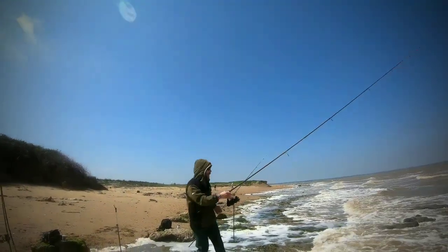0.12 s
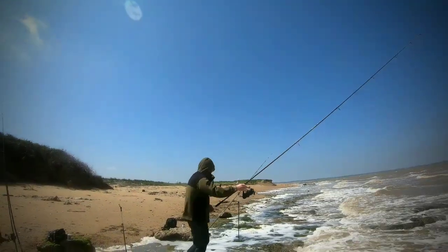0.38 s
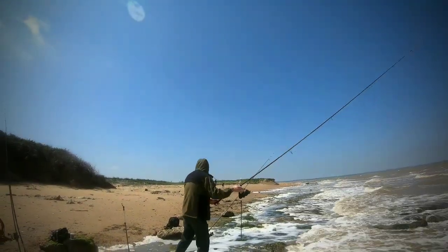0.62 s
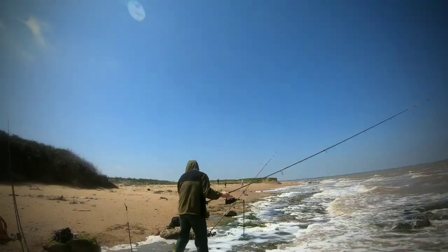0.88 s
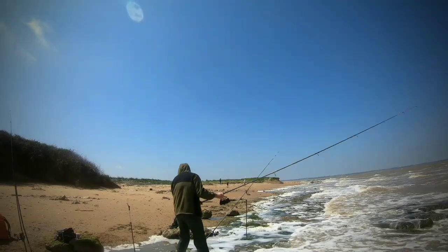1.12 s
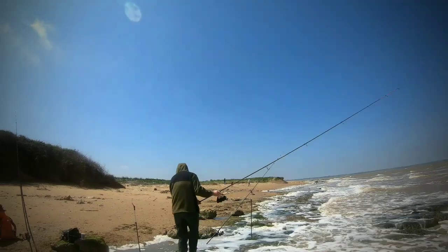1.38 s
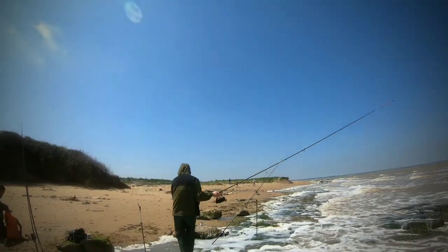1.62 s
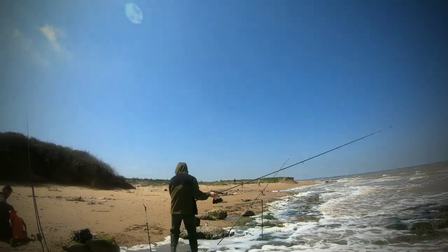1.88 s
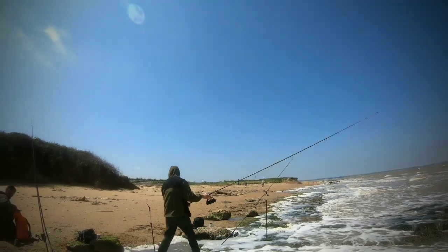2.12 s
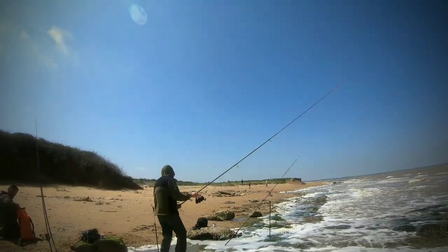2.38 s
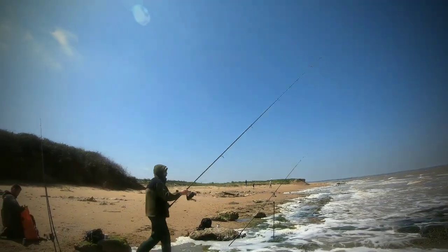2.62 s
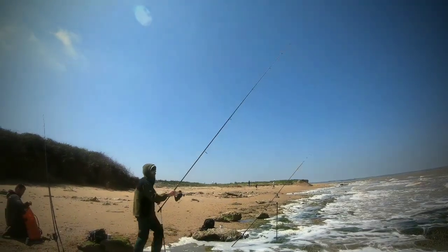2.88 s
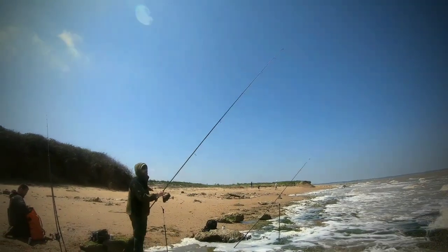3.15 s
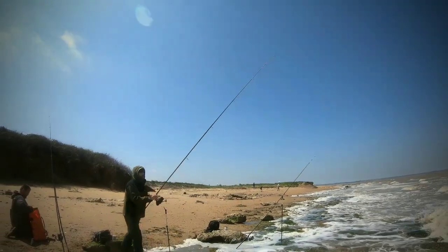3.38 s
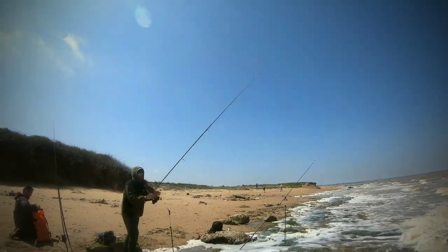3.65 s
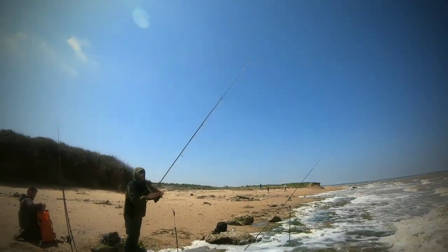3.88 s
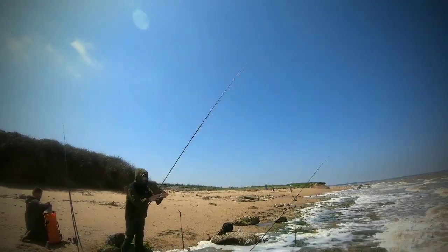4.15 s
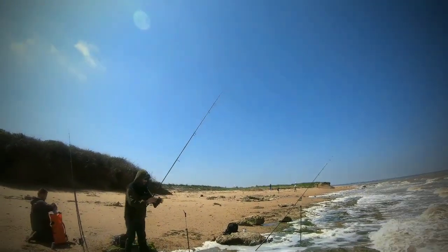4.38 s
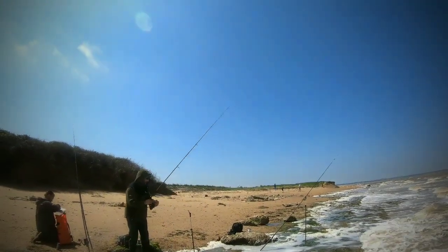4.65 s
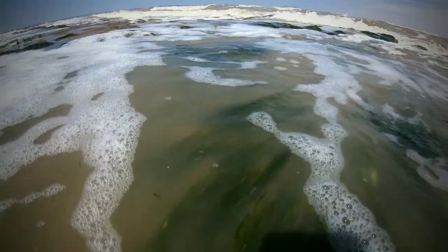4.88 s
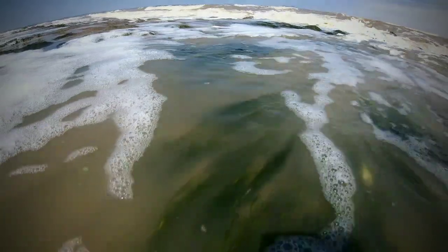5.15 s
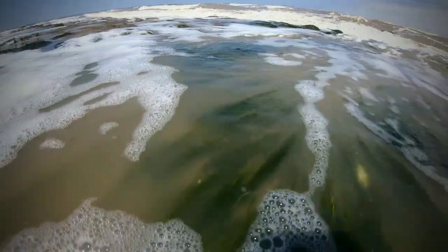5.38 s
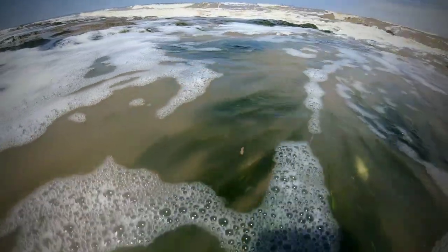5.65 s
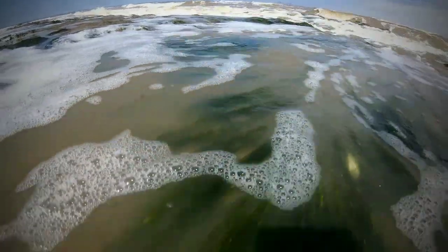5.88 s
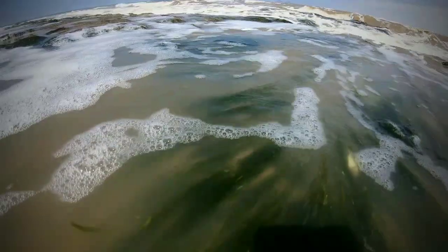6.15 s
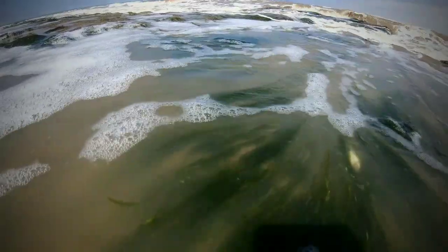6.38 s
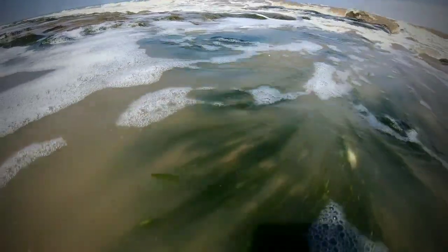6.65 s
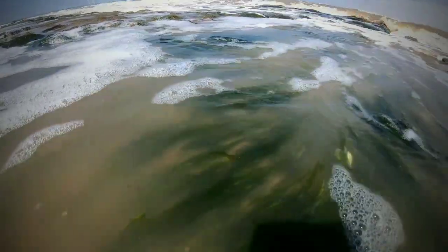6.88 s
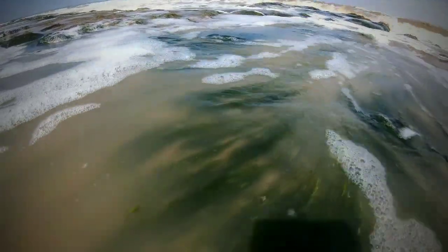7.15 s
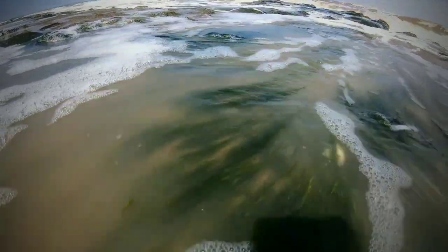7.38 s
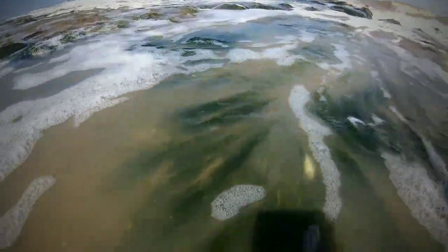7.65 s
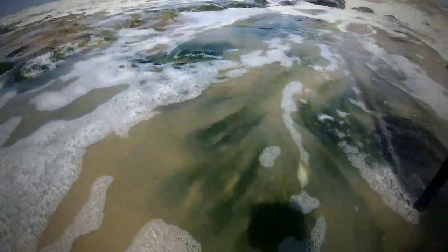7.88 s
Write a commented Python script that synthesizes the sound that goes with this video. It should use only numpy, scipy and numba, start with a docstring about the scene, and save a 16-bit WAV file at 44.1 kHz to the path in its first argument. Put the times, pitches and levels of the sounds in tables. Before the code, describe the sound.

Surf washes and roars over beach rocks while wind rumbles and slaps the microphone, then a brief silence and quieter foaming water under more low wind.

```python
"""Surf breaks over rocks on a windy beach: thousands of ringing bubbles mixed with noise make the roar
and fizz, and single waves ring as swelling bands of noise. Wind shakes a microphone port in a low rumble
of filtered noise, with short noise buffets and rising whistles. A few drops tick close by, and drifting
spray brightens the top. After a cut to silence, a second scene fades in low over the washing foam."""
import sys
import numpy as np
from scipy import signal
from scipy.fft import rfft, irfft, next_fast_len
from scipy.io import wavfile
from scipy.ndimage import uniform_filter1d
from numba import njit

SR = 44100
rng = np.random.default_rng(int(sys.argv[2]) if len(sys.argv) > 2 else 0)


def invert_db(x):
    """Field ratio 10**(x/20) for x, a level in decibels (scalar or array-like)."""
    u = np.asarray(x, float) / 20
    return 10 ** u


def int16_out(signal):
    """Quantize to a 16-bit WAV file."""
    q = np.round(np.clip(np.atleast_2d(signal).T, -1, 1) * 32767)
    wavfile.write(sys.argv[1], SR, q.astype(np.int16))


N = 353682  # samples, about 8 s
T = np.arange(N) / SR  # s
HZ = np.fft.rfftfreq(next_fast_len(N), 1 / SR)
CUT_S, FADE_FROM_S, FADE_TO_S = 4.922, 5.108, 5.21  # first scene stops; second fades in


def unit(x):
    """Scale to rms 1."""
    return x / np.sqrt(np.mean(x ** 2))


def shaped(x, gain):
    """Filter by a gain for each frequency."""
    size = next_fast_len(N)
    return irfft(rfft(x, size) * gain, size)[:N]


def colour(points):
    """Gain curve through (f/Hz, level/dB) points on a log frequency axis."""
    hz, db = np.transpose(points)
    return invert_db(np.interp(np.log(HZ + 1), np.log(hz), db))


def curves(tables):
    """Join the scenes' tables and draw each column as a curve over time."""
    s, *columns = np.transpose(np.concatenate(tables))
    return [np.interp(T, s, column) for column in columns]


def random_level(rate):
    """Random steps, rate a second, smoothed into a wandering curve of rms 1."""
    hold = int(SR / rate)
    steps = np.repeat(rng.standard_normal(N // hold + 1), hold)
    return unit(uniform_filter1d(uniform_filter1d(steps, hold), hold)[:N])


def swells(rows):
    """Add up bell-shaped rises or falls in dB, one a row."""
    return sum(db * np.exp(-(2 * (T - s) / max(length, .01)) ** 2) for s, db, length in rows)


def evened(x, span_s, share=0.87):
    """Take out a share of the noise's own swell over span_s, so that the level curves stand out."""
    k = max(int(span_s * SR), 64)
    power = uniform_filter1d(uniform_filter1d(x ** 2, k), k)
    return x / power ** (share / 2)


@njit
def bubbles(start, hz, cycles, size, n, glide):
    """Each bubble rings and dies within a few cycles, rising in pitch as it nears the surface."""
    out = np.zeros(n)
    for k in range(len(start)):
        length = int(cycles[k] * SR / hz[k])
        turn = np.exp(2j * np.pi * hz[k] / SR - 2 / length)
        rise = np.exp(2j * np.pi * hz[k] / SR * glide / length)
        z = size[k] + 0j
        for i in range(start[k], min(start[k] + 3 * length, n)):
            out[i] += z.imag
            z *= turn
            turn *= rise
    return out


# the foam hiss changes less than the wash: it takes only a share of each change around the usual wash
HISS_DB, HISS_FOLLOWS, USUAL_WASH_DB = -7, 0.48, -41
# washing and breaking water, one table a scene:
# (t/s, wash level/dB in the middle band, low roar level/dB against the scene's colour)
SURF_LEVELS = [
    [(0.0, -39.5, 0), (0.4, -39.5, -2.5), (0.65, -37.5, -2), (0.85, -35.5, 0), (1.03, -37.5, 1.5),
     (1.17, -37.5, 2.5), (1.3, -38.5, 3), (1.5, -36, 1), (1.8, -37, 0), (2.1, -37, 2), (2.5, -35, -1),
     (2.75, -34, -2.5), (2.82, -33, -5), (2.9, -33, -5), (2.98, -35, -5), (3.03, -39.5, -1.5),
     (3.15, -38, -3.5), (3.45, -38.5, -5.5), (4.0, -42, -1.5), (4.25, -46.5, -3), (4.6, -43, -3.5),
     (4.9, -42, -5.5)],
    [(5.25, -47, 0), (5.55, -43.5, 0.5), (6.15, -43.5, -0.5), (6.55, -41.5, 1), (7.07, -43.5, 0.5),
     (7.29, -42, 1), (7.55, -41.5, -2), (8.0, -39.5, -2.5)],
]
# balance of low and high in the surf, one table a scene: (f/Hz, relative level/dB per Hz)
SURF_TONE = [
    [(120, -10.5), (250, -4.5), (420, -6), (540, -4.5), (700, -5.5), (1100, -7.5), (1500, -9),
     (2200, -11.5), (3300, -14), (6000, -14.5), (15000, -15)],
    [(120, -28), (250, -5.5), (450, -5.5), (700, -4), (1340, -7), (2120, -14.5), (3300, -20), (6000, -18.5),
     (15000, -23)],
]
# fine spray carried by the wind brightens the very top: (peak t/s, rise level/dB, length t/s)
SPRAY_RISES = [(0.6, 3, 2.0), (2.3, 8, 1.1), (6.45, 14, 1.1), (7.9, 16, .6)]


def surf(foam_share=0.28, swell_db=0.4, flicker_db=0.34):
    """Far breakers blur into noise, near foam bubbles; each half octave swells and flickers."""
    wash_db, roar_db = curves(SURF_LEVELS)
    hiss_db = HISS_DB - (1 - HISS_FOLLOWS) * (wash_db - USUAL_WASH_DB)
    spray_db = swells(SPRAY_RISES)

    when, pitch, ringing, strength = rng.random((60000, 4)).T
    start = (when * N).astype(np.int64)
    hz = 250 * (14000 / 250) ** pitch
    # equal power per Hz, so that bubbles and noise share one colour
    size = invert_db(-1.5 * np.log(strength + 1e-9)) * hz
    foam = bubbles(start, hz, 3 + 6 * ringing, size, N, .1)
    breakers = rng.standard_normal(N)
    water = np.sqrt(foam_share) * unit(foam) + np.sqrt(1 - foam_share) * breakers

    # each colour is scaled so that the wash level holds in this middle band
    wash_band = (HZ > 1200) & (HZ < 3500)
    first, second = (colour(c) / np.sqrt(np.mean(colour(c) ** 2 * wash_band)) for c in SURF_TONE)
    water = np.where(T < CUT_S, shaped(water, first), shaped(water, second))

    out, surge, near = 0, random_level(9), random_level(8)
    for octave in np.arange(-4, 3.5, .5):  # octaves from 2 kHz
        distance = np.abs(np.log2(HZ / 2000 + 1e-9) - octave)
        band = shaped(water, np.clip(1 - 2 * distance, 0, 1))
        # neighbouring bands share part of their swell
        near = 0.32 * near + 0.57 * random_level(8.9)
        band_db = roar_db * np.clip(-octave / 1.5, 0, 1)
        band_db = band_db + hiss_db * np.clip(octave / 1.6, 0, 1)
        band_db = band_db + spray_db * np.clip(octave - 2.2, 0, 1)
        band_db = band_db + swell_db * surge + 0.22 * near + flicker_db * random_level(14)
        out = out + band * invert_db(band_db)
    return out * invert_db(wash_db)


# single breakers at different distances, each filling its own band: # (peak t/s, level/dB before a random
# wobble, length t/s, centre f/Hz)
WAVE_BOOMS = [(0.92, -39, 0.28, 640), (1.097, -42, .2, 557), (1.3, -38, 0.27, 560), (1.55, -44, 0.36, 544),
              (1.95, -39.5, .5, 580), (2.3, -42, 0.34, 556), (0.25, -51, 0.76, 8000), (1.9, -42, 1.3, 270),
              (1.8, -47, 1.0, 3300), (2.87, -43.5, 0.37, 3060), (4.5, -47, .6, 300), (5.9, -46.5, .6, 1500),
              (5.3, -46.5, 0.27, 400), (5.65, -45.5, 0.53, 483), (6.5, -46, 0.56, 1000),
              (7.25, -45, .2, 1600)]


def booms(half_width_octaves=.3):
    """The bubble cloud of one wave rings as a band of noise that swells and dies."""
    out = np.zeros(N)
    for s, db, length, hz in WAVE_BOOMS:
        band = np.exp(-(np.log2(HZ / hz + 1e-9) / half_width_octaves) ** 2)
        swell = np.exp(-(2 * (T - s) / max(length, .05)) ** 2)
        wobble = invert_db(1.5 * random_level(12))
        out += invert_db(db) * swell * wobble * unit(shaped(rng.standard_normal(N), band))
    return out


# small eddies: level at the usual wind, and dB gained for each dB of wind
EDDY_DB, EDDY_GROWTH, USUAL_WIND_DB = -36.5, 0.8, -32
# wind at the port before gusts, one table a scene:
# (t/s, rumble level/dB, choppiness: level/dB of small eddies over their usual share)
WIND_LEVELS = [
    [(0.0, -31, 1), (0.13, -36, -4.5), (0.2, -31, 6), (0.4, -32.5, -0.5), (0.56, -31.5, -7),
     (0.63, -39.5, 4), (0.78, -38, 7.5), (0.9, -33, -1.5), (1.4, -33.5, -3), (2.25, -34, 4),
     (2.45, -30.5, 2), (2.7, -31, 2), (3.0, -27.5, -1.5), (3.3, -30, 0), (3.6, -33.5, 1.5), (3.75, -31, -8),
     (3.9, -29, -1), (3.96, -28, 4), (4.15, -30, 1), (4.23, -32, -2.5), (4.31, -44, -7), (4.36, -32.5, 0),
     (4.45, -32, 0), (4.6, -32.5, 3), (4.9, -35.5, -3.5)],
    [(5.2, -31, 3), (5.45, -32, 0.5), (5.55, -33, 0.5), (5.8, -30.5, -1), (6.0, -32.5, -3.5),
     (6.2, -36, -1), (6.42, -37.5, 1.5), (6.54, -34, 1.5), (6.6, -27, 5), (6.7, -27.5, 1.5),
     (6.85, -28.5, 5.5), (7.0, -28.5, 1), (7.2, -30.5, 1.5), (7.4, -30.5, 0.5), (7.55, -31.5, 4),
     (7.68, -30, 1.5), (7.8, -30, -4.5), (7.86, -40, 1), (8.0, -31.5, 0.5)],
]
# gusts swell the wind for a moment, lulls let it drop: (peak t/s, rise or fall level/dB, length t/s)
GUSTS_AND_LULLS = [(0.17, 6.5, .03), (0.235, 5, 0.021), (0.28, 10, 0.017), (0.315, 8, 0.035),
                   (0.39, -2, 0.027), (0.43, 8, 0.02), (0.48, 1, .03), (0.525, 8, 0.021), (0.565, 6.5, .04),
                   (0.875, 2, 0.033), (1.475, 7, 0.037), (1.609, 6.5, 0.042), (1.83, 4, 0.027),
                   (2.40, 9, 0.029), (2.459, 9, 0.021), (2.485, -12, 0.023), (2.51, 6, 0.026),
                   (2.59, -5, .04), (2.65, 5, 0.06), (2.71, -1, 0.024), (2.748, 5.5, 0.051),
                   (2.79, -6, .04), (2.84, 2, 0.054), (2.905, 6.5, 0.044), (2.965, 3.5, 0.026),
                   (3.0, -7, 0.048), (3.067, 7, 0.037), (3.15, -1, .025), (3.215, -2, 0.02),
                   (3.283, 8.5, 0.038), (3.39, -10, 0.035), (3.433, 12, 0.034), (3.525, 12.5, 0.062),
                   (3.625, 4, .015), (3.68, 6, 0.03), (3.79, 4, 0.056), (3.85, -8, 0.026),
                   (3.949, 10.5, 0.084), (4.01, -8, .025), (4.047, 8, 0.018), (4.068, 8, 0.033),
                   (4.09, -8, 0.014), (4.12, 8, 0.047), (4.15, -5.5, .02), (4.37, 3, .02),
                   (4.415, 8.5, 0.025), (4.49, -5, 0.046), (4.62, 4, .03), (4.645, -4, .025),
                   (4.715, 5, .03), (4.745, -7, .025), (5.234, 7.5, 0.018), (5.384, 9, 0.025),
                   (5.67, 4, 0.05), (5.86, 6.5, 0.033), (6.0, 2.5, .04), (6.13, 5.5, 0.023),
                   (6.278, 6, 0.035), (6.41, -3, .03), (6.695, -3, 0.018), (6.805, -5, .02),
                   (6.878, -7, .02), (6.9, 2, .02), (7.035, -5, .025), (6.685, 2.5, 0.06),
                   (6.785, 7, 0.029), (6.84, 2, 0.023), (6.93, 6.5, 0.077), (7.0, 1, .05),
                   (7.07, 5.5, 0.032), (7.24, -7, 0.025), (7.287, 4.5, 0.055), (7.41, 0, .03),
                   (7.485, 6, .03), (7.62, 3.5, 0.059), (7.98, 0.5, 0.025)]
# tone of the large eddies: (f/Hz, relative level/dB per Hz)
RUMBLE_TONE = [(10, -13), (22, -1), (45, 4), (75, 4), (120, -0.5), (170, -14), (260, -37.5), (1000, -100)]
# tone of the small eddies: (f/Hz, relative level/dB per Hz)
EDDY_TONE = [(20, -66), (60, -18), (120, -1), (170, 1), (225, -3), (290, -10.5), (400, -17), (800, -28),
             (1600, -46), (5000, -100)]


def wind(flutter_db=1.5, eddy_flutter_db=2.5):
    """Large eddies rock the diaphragm; small, patchier ones flap above them and follow the wind."""
    steady_db, choppy_db = curves(WIND_LEVELS)
    rumble_db = steady_db + swells(GUSTS_AND_LULLS)
    eddy_db = EDDY_DB + EDDY_GROWTH * (rumble_db - USUAL_WIND_DB) + choppy_db
    flutter = random_level(40)
    rumble = evened(shaped(rng.standard_normal(N), colour(RUMBLE_TONE)), 0.06)
    rumble = unit(rumble * invert_db(flutter_db * flutter))
    patchy_db = eddy_flutter_db * (0.95 * flutter + 0.5 * random_level(30))
    eddies = evened(shaped(rng.standard_normal(N), colour(EDDY_TONE)), 0.034)
    eddies = unit(eddies * invert_db(patchy_db))
    return invert_db(rumble_db) * rumble + invert_db(eddy_db) * eddies


# slaps of wind, each starting 3 ms ahead of its time: (t/s, peak level/dB, reach f/Hz, length t/s)
WIND_SLAPS = [(0.298, -20.5, 354, 0.034), (0.503, -24, 600, 0.026), (1.464, -20, 302, 0.021),
              (2.443, -24, 302, 0.016), (2.694, -21, 350, 0.028), (3.114, -26, 700, 0.022),
              (3.155, -23.5, 700, 0.038), (3.187, -20, 900, 0.019), (3.281, -19, 596, 0.012),
              (3.408, -23, 600, 0.014), (3.427, -19.5, 800, 0.016), (3.495, -22, 350, 0.011),
              (3.501, -15.5, 900, 0.011), (3.514, -21, 300, 0.014), (3.533, -21, 300, 0.015),
              (3.65, -17, 900, 0.014), (3.671, -25, 700, .012), (3.754, -23.5, 404, 0.034),
              (3.837, -23, 402, 0.03), (3.913, -28, 800, 0.011), (3.93, -19, 450, 0.014),
              (3.942, -16, 900, .012), (3.958, -17.5, 1300, 0.032), (3.981, -19, 1800, 0.016),
              (3.996, -17, 900, 0.0091), (4.017, -26, 500, 0.01), (4.043, -19.5, 300, 0.025),
              (4.07, -19.5, 348, 0.0116), (4.097, -20, 1000, 0.02), (4.12, -19, 495, 0.018),
              (4.186, -22, 499, 0.015), (4.21, -26, 400, .014), (4.399, -23, 1000, 0.015),
              (4.444, -33, 300, .01), (4.466, -31, 400, .008), (4.526, -22, 900, 0.012),
              (4.546, -26, 600, 0.016), (4.576, -27, 600, 0.015), (4.704, -26, 297, 0.016),
              (5.205, -26, 400, 0.01), (5.382, -25, 300, .01), (6.671, -23, 350, .014),
              (6.707, -26, 400, .014), (6.737, -26, 500, 0.031), (6.785, -22, 300, .01),
              (6.84, -26, 300, 0.018), (6.921, -24.5, 710, 0.025)]


def buffets():
    """A gust slaps the port: a short burst of turbulence, falling off above its reach."""
    out = np.zeros(N)
    t = np.arange(int(.15 * SR)) / SR
    # most of the push stays low even when the slap reaches high
    body = signal.butter(1, [70, 400], "band", fs=SR, output="sos")
    for s, db, reach_hz, length in WIND_SLAPS:
        low = signal.butter(3, np.clip(reach_hz, 150, 3000), fs=SR, output="sos")
        gust = signal.sosfilt(low, rng.standard_normal(len(t)))
        gust = evened(signal.sosfilt(body, gust), 0.016)
        attack = np.minimum(t / 0.0057, 1)
        burst = gust * attack * np.exp(-(t / max(length, .005)) ** 2.9)
        i = int((s - .003) * SR)
        out[i:i + len(t)] += invert_db(db) * burst / np.abs(burst).max()
    return out


# whistling gusts: (start t/s, level/dB at the peak, from f/Hz, to f/Hz, length t/s)
GUST_WHISTLES = [(3.647, -28, 600, 1790, .03), (3.958, -30.5, 800, 2200, .015),
                 (3.984, -31.5, 887, 2290, .015), (4.101, -28, 606, 1300, .02),
                 (6.925, -30, 450, 1000, .032)]


def whistles(rough=.35):
    """A hard gust whistles across the port's edge: an unsteady tone that climbs as the gust speeds up."""
    out = np.zeros(N)
    for s, db, from_hz, to_hz, length in GUST_WHISTLES:
        samples = max(length, .005) * SR
        u = np.arange(int(samples)) / samples  # 0 to 1 through the whistle
        wobble = unit(uniform_filter1d(rng.standard_normal(4096), size=40))[:len(u)]
        hz = (from_hz + (to_hz - from_hz) * u) * (1 + rough * wobble)
        tone = np.sin(2 * np.pi * np.cumsum(hz) / SR)
        i = int(s * SR)
        out[i:i + len(u)] += invert_db(db) * np.sin(np.pi * u) ** 1.2 * tone
    return out


# drops: (t/s, peak level/dB, pitch f/Hz)
DROP_TICKS = [(4.329, -32, 1400), (4.609, -40, 8000), (4.759, -33, 1500), (4.871, -23, 1800),
              (4.909, -26, 1500), (5.779, -33, 2500)]


def drops():
    """A drop strikes close by: a noise tick of a few milliseconds in a band around its pitch."""
    out, t = np.zeros(N), np.arange(int(.02 * SR)) / SR
    for s, db, hz in DROP_TICKS:
        band = signal.butter(2, [hz / 2.0, hz * 1.24], "band", fs=SR, output="sos")
        tick = unit(signal.sosfilt(band, rng.standard_normal(len(t)))) * np.exp(-t / .0025)
        i = int(s * SR)
        out[i:i + len(t)] += invert_db(db) * tick / np.abs(tick).max()
    return out


def scene():
    """Water and wind at one microphone."""
    return (surf() + booms() + wind() + buffets() + whistles() + drops())[None]


# the waterproof housing dulls the treble and rings faintly near 8 and 11 kHz: (f/Hz, gain level/dB)
HOUSING_TONE = [(3300, 0.5), (4300, -4.5), (5200, -6.5), (5750, -13.5), (7200, -15.5), (8050, -11.5),
                (9800, -21.5), (10700, -21), (12000, -30.5), (13400, -35), (15000, -59), (17000, -76.5)]


def microphone(x, overload=0.42):
    """The housing dulls the sound; the capsule rounds the peaks and cannot pass the overload level."""
    return overload * np.tanh(shaped(x, colour(HOUSING_TONE)) / overload)


def low_pass(x):
    """Removes everything above the highest recorded frequency."""
    return signal.sosfilt(signal.butter(12, 15100, fs=SR, output="sos"), x)


def record(dry):
    """Pass the sound through the microphone; the first scene stops dead, the second fades in."""
    fade = np.clip((T - FADE_FROM_S) / (FADE_TO_S - FADE_FROM_S), 0, 1) ** 1.4
    heard = microphone(dry[0]) * np.where(T < CUT_S, 1, fade)
    return low_pass(heard[None])


dry = scene()
out = record(dry)
int16_out(out)
```